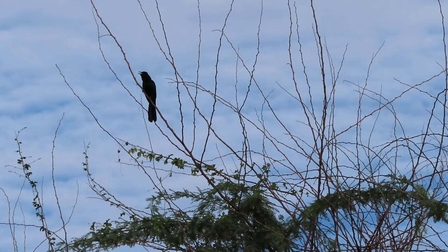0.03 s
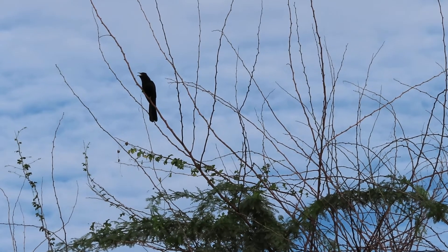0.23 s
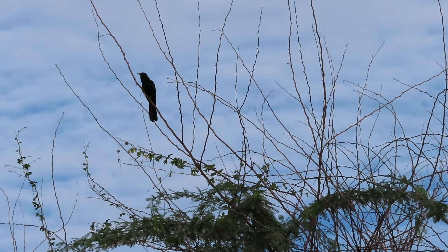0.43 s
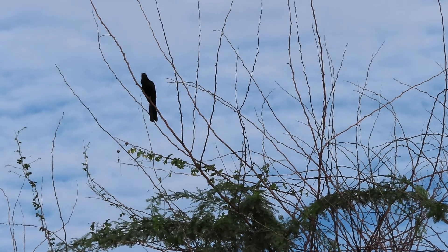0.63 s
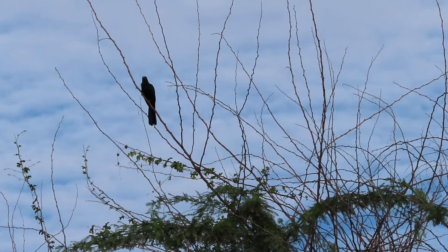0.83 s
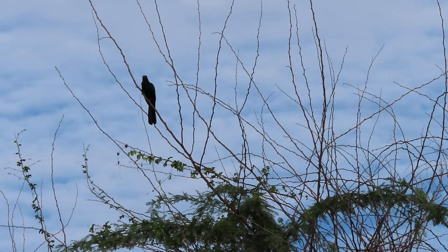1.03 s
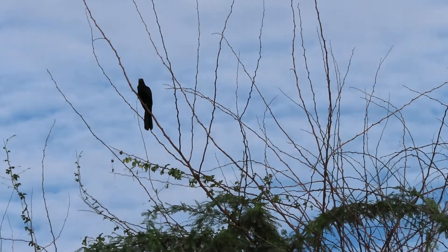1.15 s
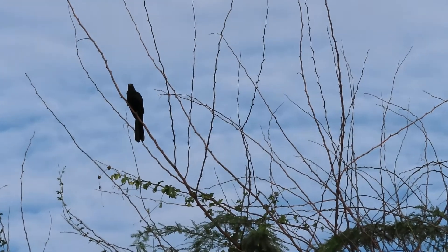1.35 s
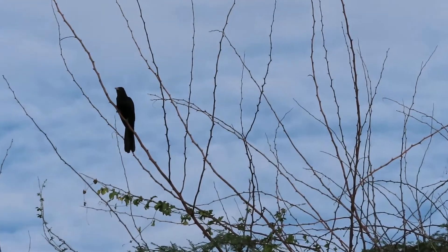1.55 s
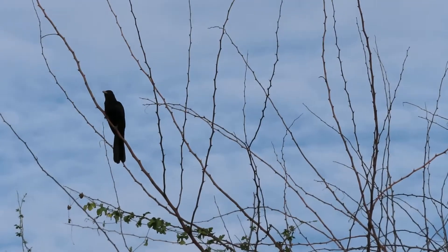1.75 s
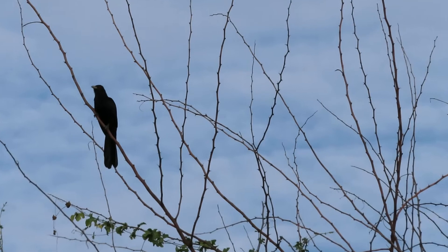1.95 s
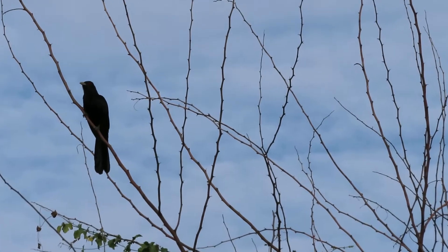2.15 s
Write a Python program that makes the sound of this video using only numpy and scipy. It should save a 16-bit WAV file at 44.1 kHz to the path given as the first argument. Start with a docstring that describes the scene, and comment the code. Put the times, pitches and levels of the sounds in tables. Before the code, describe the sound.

From a bare tree, a koel gives a clear two-note call, overlapped and followed by a smaller bird's two thin rising whistles. Far birds, caws and a faint horn sound behind, with light outdoor echo and soft town rumble.

```python
"""A koel whistles a short note and a rising, then falling note from a bare tree: a near-pure tone with
faint, raspy overtones. A small bird nearby gives two rising whistles, plain gliding sines. Behind them
are far chirps, a far koel, hoarse caws and one short knock (pulses and noise through resonances) and a
distant horn (a harmonic stack). All echo off trunks and walls, over town rumble and air hiss."""
import sys
import numpy as np
from scipy import signal
from scipy.io import wavfile
from scipy.ndimage import uniform_filter1d

SR = 44100
rng = np.random.default_rng(int(sys.argv[2]) if len(sys.argv) > 2 else 0)


def generate_wav(sig):
    """Save sig (samples, or channels by samples) to the path in sys.argv[1] as 16-bit PCM at SR."""
    pcm = np.round(np.clip(np.atleast_2d(sig).T, -1, 1) * 32767).astype(np.int16)
    wavfile.write(sys.argv[1], SR, pcm)


N = 97020


def amp(db):
    return 10 ** (np.asarray(db) / 20)


def unit_rms(x):
    return x / np.sqrt(np.mean(x ** 2) + 1e-20)


def flutter(n, size):
    """Random wobble of rms 1, smoothed twice over size samples."""
    return unit_rms(uniform_filter1d(uniform_filter1d(rng.standard_normal(n), size), size))


def at_hz(points, hz):
    """Table lookup on a log frequency axis."""
    f, value = np.transpose(points)
    return np.interp(np.log(hz + 1), np.log(f + 1), value)


def contour(curve):
    """Smoothed pitch and level per sample."""
    times, *columns = np.transpose(curve)
    t = np.arange(times[0], times[-1], 1 / SR)
    return [uniform_filter1d(np.interp(t, times, c), size=100, mode="nearest") for c in columns]


def resonate(x, hz, width_hz, order=1):
    """Cascade of identical resonances, output rms 1."""
    carrier = np.exp(2j * np.pi * hz * np.arange(len(x)) / SR)
    pole = np.exp(-np.pi * width_hz / SR)
    for _ in range(order):
        x = (carrier * signal.lfilter([1 - pole], [1, -pole], x / carrier)).real
    return unit_rms(x)


def place(mix, start_s, sound, pan_db, fade_s=0.0038):
    """Adds a sound with faded ends; pan_db is left minus right."""
    t = np.arange(sound.shape[-1]) / SR
    fade = np.sin(np.pi / 2 * np.clip(np.minimum(t, t[-1] - t) / fade_s, 0, 1)) ** 2
    panned = sound * fade * amp(np.outer([.5, -.5], pan_db))
    part = mix[:, round(start_s * SR):][:, :len(t)]
    part += panned[:, :part.shape[1]]


# Each row: frequency in Hz, left-right correlation.
COHERENCE = [(50, 0.99), (150, 0.96), (350, 0.38), (800, 0.88), (2500, 0.53), (10000, 0.25)]


def stereo_noise(spectrum, patch_db):
    """Coloured noise of rms 1 with drifting patches in time and frequency."""
    hz = np.fft.rfftfreq(1024, 1 / SR)
    a, b, c, d, patches = rng.standard_normal((N // 256 + 5, len(hz), 5)).T
    patches = unit_rms(uniform_filter1d(uniform_filter1d(patches, size=8, axis=0), size=12, axis=1))
    coherence = at_hz(COHERENCE, hz)[:, None]
    left = a + 1j * b
    right = coherence * left + np.sqrt(1 - coherence ** 2) * (c + 1j * d)
    bins = np.array([left, right]) * amp(at_hz(spectrum, hz)[:, None] + patch_db * patches)
    return unit_rms(signal.istft(bins, nperseg=1024, noverlap=768)[1][:, :N])


# Noise spectra. Each row: frequency in Hz, relative density in dB.
AIR_SPECTRUM = [(20, -33.5), (60, -3.5), (300, -14.5), (480, -16.5), (580, -31.5), (1300, -28.5),
                (3000, -33.5), (6000, -40), (10000, -47.5), (12000, -54.5), (15000, -58)]
TRAFFIC_SPECTRUM = [(300, -50), (600, 2.5), (1500, 1), (3000, -10), (8500, -34), (10000, -19), (12000, -65)]
# Each row: time in seconds, level in dB.
TRAFFIC_LEVEL = [(0, -47), (0.2, -48.5), (.6, -45.5), (1.0, -46.5), (1.3, -47.5), (1.42, -57)]
# Each row: centre in Hz, width in Hz, level in dB.
HUMS = [(135.9, 3.04, -46.5), (81.5, 13.5, -52), (491, 2.3, -60.5)]


def town():
    """Rumble and air hiss, a wash of passing traffic that fades, and wavering narrow-band hums."""
    air = amp(-43) * stereo_noise(AIR_SPECTRUM, patch_db=2)
    traffic_db = np.interp(np.arange(N) / SR, *np.transpose(TRAFFIC_LEVEL))
    traffic = amp(traffic_db) * stereo_noise(TRAFFIC_SPECTRUM, patch_db=3)
    hums = sum(amp(db) * resonate(rng.standard_normal(N), hz, width_hz) for hz, width_hz, db in HUMS)
    return air + traffic + hums


def echoes(x, t60_s=0.68, gap_s=0.0062):
    """Sparse reflections from trunks and walls, partly shared by the two sides."""
    slots = np.arange(0, SR - 40, 40)
    tap_at = slots + rng.integers(0, 40, (2, len(slots)))
    taps = np.zeros((2, SR))
    np.put_along_axis(taps, tap_at, rng.choice([-1., 1.], tap_at.shape), 1)
    t = np.arange(SR) / SR
    envelope = amp(-60 * t / t60_s) * np.clip(t / gap_s - 1, 0, 1)
    tail = (taps + 0.7 * taps[::-1]) * envelope
    return signal.fftconvolve(x.mean(0)[None], tail / np.linalg.norm(tail[0]), axes=1)[:, :N]


# Each row: start and length in seconds, pitch in Hz, level in dB, band centre and half-width in Hz.
TOOTS = [(.635, .28, 427.7, -51, 3220, 400), (.77, .095, 598, -50, 2980, 850),
         (1.02, .25, 593, -49, 1530, 500), (.5, .17, 608, -53, 1820, 300)]


def distant_horn(waver_db=2, pitch_waver=.002):
    """Wavering harmonic stacks of which distance leaves one bright band."""
    mix = np.zeros((2, N))
    harmonics = np.arange(1, 11)[:, None]
    for start_s, length_s, hz, db, band_hz, half_width_hz in TOOTS:
        n = round(length_s * SR)
        cycles = np.cumsum(hz * (1 + pitch_waver * flutter(SR // 2, size=900)[:n])) / SR
        waver = amp([waver_db * flutter(SR // 2, size=500)[:n] for _ in harmonics])
        band = np.exp(-((harmonics * hz - band_hz) / half_width_hz) ** 4)
        tone = (band * waver * np.sin(2 * np.pi * harmonics * cycles)).sum(0)
        swell = np.sqrt(np.sin(np.pi * np.arange(n) / n))
        place(mix, start_s, amp(db) * swell * tone, pan_db=5.5)
    return mix


# Each row: start and length in seconds, main resonance in Hz, level in dB. The last row is the knock.
CAWS_AND_KNOCK = [(0, 0.042, 3640, -50.5), (0.212, 0.084, 1580, -41), (0.382, 0.095, 1627, -34.5),
                  (0.624, 0.25, 2480, -51.5), (.905, .1, 2800, -48), (.905, .15, 4100, -52.5),
                  (1.368, 0.028, 1150, -44)]


def caws_and_knock(pulse_hz=266.8, jitter=0.22, roughness=0.66):
    """Hoarse caws and one short knock: jittered pulses and gated noise through three resonances."""
    mix = np.zeros((2, N))
    for start_s, length_s, resonance_hz, db in CAWS_AND_KNOCK:
        n = round(length_s * SR)
        cycles = np.cumsum(pulse_hz * (1 + jitter * flutter(SR // 4, size=200)[:n])) / SR
        gate = np.exp(-4 * (cycles % 1))
        pulses = unit_rms(gate - gate.mean())
        noise = unit_rms((1 + gate) * rng.standard_normal(n))
        drive = (1 - roughness) * pulses + roughness * noise
        width_hz = .46 * resonance_hz
        burst = (resonate(drive, resonance_hz, width_hz, order=3)
                 + amp(-14) * resonate(drive, 1.81 * resonance_hz, 2 * width_hz, order=3)
                 + amp(-28) * resonate(drive, 7130, width_hz, order=3))
        envelope = np.hanning(n) ** 0.08 * np.sqrt(1 - (np.arange(n) / n) ** 2)
        place(mix, start_s, amp(db) * envelope * burst, pan_db=4)
    return mix


def whistle(hz, db, right_lead_s=0):
    """Gliding stereo sine at an rms level of db."""
    cycles = np.cumsum(hz) / SR + np.outer([-.5, .5], hz * right_lead_s)
    return np.sqrt(2) * amp(db) * np.sin(2 * np.pi * cycles)


# Each row: start and length in seconds, first, middle and last pitch in Hz, base level in dB.
FAR_CHIRPS = [(.135, .03, 3600, 3880, 3500, -52), (.225, .14, 2340, 2380, 2360, -55),
              (.42, .026, 2600, 3150, 3300, -50), (.51, .11, 4450, 3700, 3000, -60.5),
              (.545, .028, 3400, 3760, 3500, -53), (.535, .03, 1350, 1280, 1200, -43),
              (1.527, .029, 2200, 3180, 3500, -56)]
FAR_KOEL = [(.765, .07, 1430, 1350, 1120, -56), (.785, .085, 1520, 1420, 1080, -54),
            (.985, .08, 1310, 1250, 1170, -53), (1.06, .1, 1170, 1490, 1250, -51),
            (1.1, .055, 1430, 1270, 1130, -51)]


def far_birds(notes, blur_db):
    """Whistles on parabolic pitch arcs, their level blurred by the trees between."""
    mix = np.zeros((2, N))
    for start_s, length_s, first_hz, middle_hz, last_hz, db in notes:
        u = np.arange(0, length_s, 1 / SR) / length_s
        hz = first_hz * (1 - u) * (1 - 2 * u) + 4 * middle_hz * u * (1 - u) + last_hz * u * (2 * u - 1)
        swell_db = 2.3 * np.sin(np.pi * u)
        flicker_db = blur_db * flutter(SR // 5, size=200)[:len(u)]
        place(mix, start_s, whistle(hz, db + swell_db + flicker_db), pan_db=5.5)
    return mix


# One curve per whistle. Each row: time in seconds, pitch in Hz, level in dB.
RISING_WHISTLES = [
    [(.185, 4755, -52), (.198, 4160, -55), (.246, 4154, -52), (.27, 4210, -44.5), (.31, 4656, -42.5),
     (.332, 4670, -44.5), (.37, 5050, -38.5), (.395, 5210, -42.5), (.438, 5680, -43.5), (.458, 6100, -53),
     (.47, 6700, -70)],
    [(.6, 4880, -49), (.614, 4130, -53), (.66, 4020, -42.5), (.69, 4220, -44.5), (.705, 4540, -43.5),
     (.745, 4690, -45.5), (.77, 5080, -40.5), (.82, 5450, -43.5), (.875, 5770, -47.5), (.93, 6020, -60)],
]


def small_bird(warble=.005):
    """Two rising pure whistles with a slight random warble."""
    mix = np.zeros((2, N))
    for curve in RISING_WHISTLES:
        hz, db = contour(curve)
        hz *= 1 + warble * flutter(len(hz), size=300)
        place(mix, curve[0][0], whistle(hz, db, right_lead_s=40e-6), pan_db=-2.5)
    return mix


# Each row: frequency in Hz, overtone level at middle effort in dB.
KOEL_OVERTONES = [(2800, -60), (4400, -80), (6000, -73), (7200, -73), (8800, -85), (10400, -73),
                  (12000, -82), (14000, -95)]


def koel_voice(hz, db, harmonics=9, middle_effort_db=-35, rasp_db=4, rasp_rad=.18):
    """Near-pure tone; higher overtones follow the effort less and flicker more."""
    n = len(hz)
    phase = 2 * np.pi * np.cumsum(hz) / SR
    voice = amp(db) * np.sin(phase)
    for k in range(2, harmonics + 1):
        height = k / harmonics
        effort_db = .27 ** height * (db - middle_effort_db)
        flicker_db = rasp_db * height * (flutter(n, size=60) + flutter(n, size=700))
        rough_phase = phase + rasp_rad * flutter(n, size=150)
        voice += amp(at_hz(KOEL_OVERTONES, k * hz) + effort_db + flicker_db) * np.sin(k * rough_phase)
    return np.sqrt(2) * voice


# Koel notes. Each row: time in seconds, pitch in Hz, level in dB.
KOEL_SHORT = [(.075, 1490, -49), (.09, 1630, -38), (.102, 1695, -37), (.145, 1708, -41.5),
              (.235, 1804, -44.5)]
KOEL_LONG = [(.228, 1369, -62), (0.247, 1355, -32), (0.289, 1369, -32.5), (.324, 1417, -28.5),
             (.35, 1472, -21.5), (0.36, 1513, -24.5), (0.376, 1515, -17), (.388, 1536, -24),
             (0.399, 1556, -29.5), (.43, 1536, -45), (.445, 1482, -29), (.46, 1416, -37),
             (.478, 1317, -27.5), (.494, 1229, -28.5), (.515, 1126, -46), (.535, 1018, -34.5),
             (0.551, 990, -53)]
# Each row: time in seconds, left minus right in dB.
KOEL_PAN = [(.2, -0.5), (.29, -5.5), (.36, -0.5), (.44, 0.5), (.49, -1.5)]


def koel(break_at_s=.43, break_half_width_s=.04, break_db=4):
    """Two notes; the tone wavers between left and right and breaks up at the top of the long one."""
    mix = np.zeros((2, N))
    for curve in (KOEL_SHORT, KOEL_LONG):
        start_s = curve[0][0]
        hz, db = contour(curve)
        t = start_s + np.arange(len(hz)) / SR
        breaking = np.exp(-((t - break_at_s) / break_half_width_s) ** 4)
        db += break_db * breaking * flutter(len(t), size=120)
        pan_db = np.interp(t, *np.transpose(KOEL_PAN))
        place(mix, start_s, koel_voice(hz, db), pan_db)
    return mix


def scene():
    far_calls = far_birds(FAR_CHIRPS, blur_db=2.5) + far_birds(FAR_KOEL, blur_db=3.5)
    direct = distant_horn() + caws_and_knock() + far_calls + small_bird() + koel()
    return town() + amp(-11.5) * echoes(direct) + direct


def record(dry):
    """Low-pass at 15.1 kHz."""
    lowpass = signal.firwin(511, 15100, window=("kaiser", 9), fs=SR)
    return signal.oaconvolve(dry, lowpass[None], "same")


dry = scene()
out = record(dry)
generate_wav(out)
```